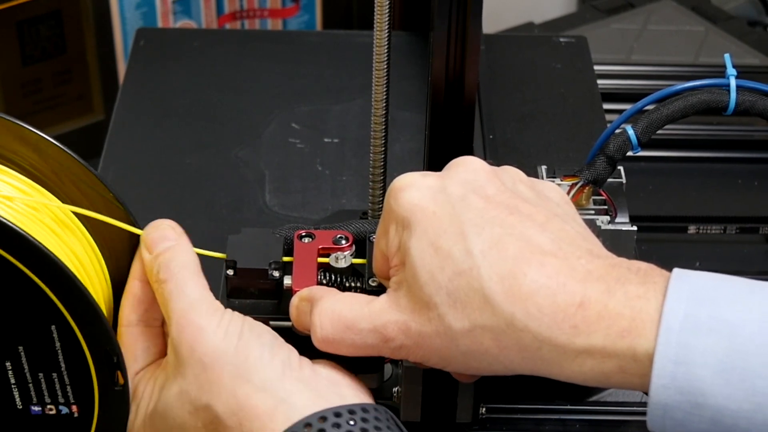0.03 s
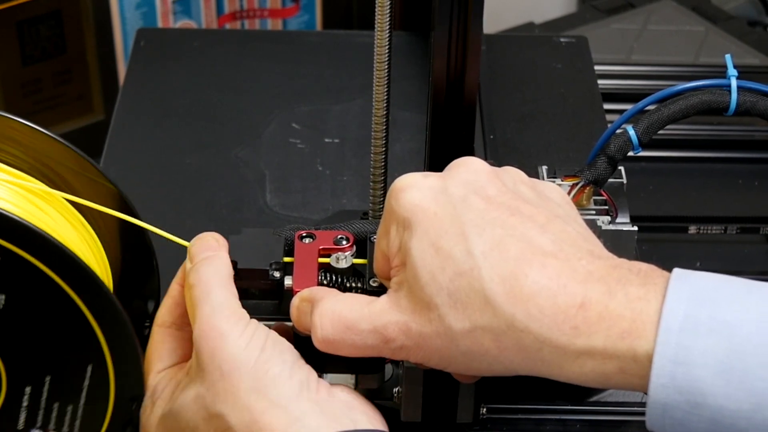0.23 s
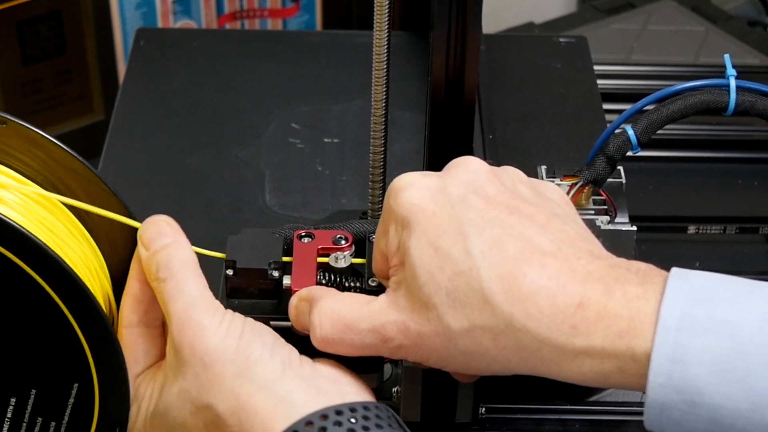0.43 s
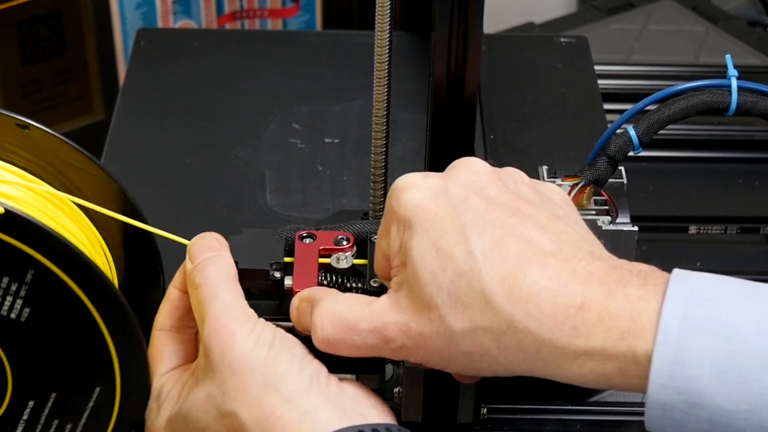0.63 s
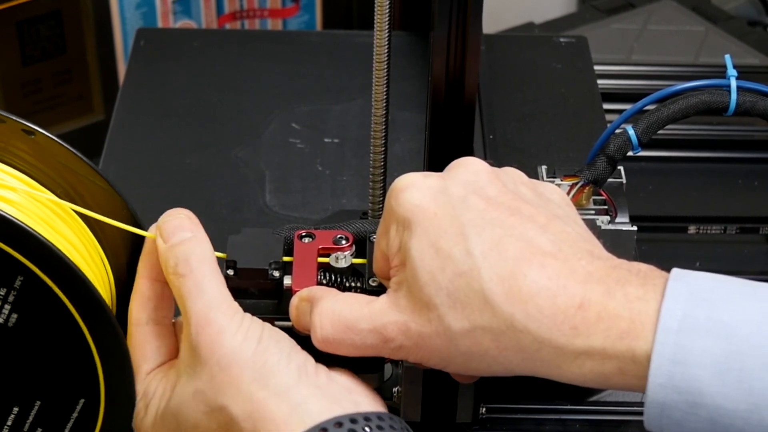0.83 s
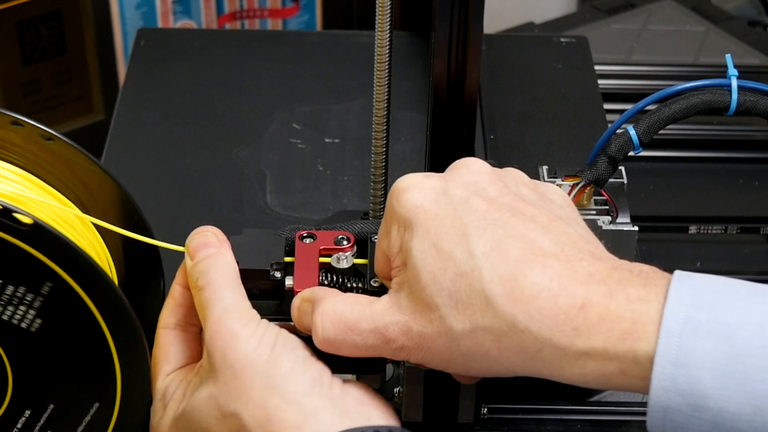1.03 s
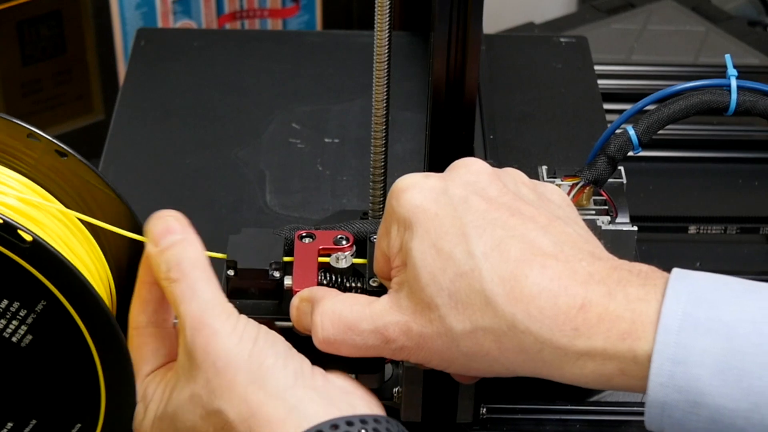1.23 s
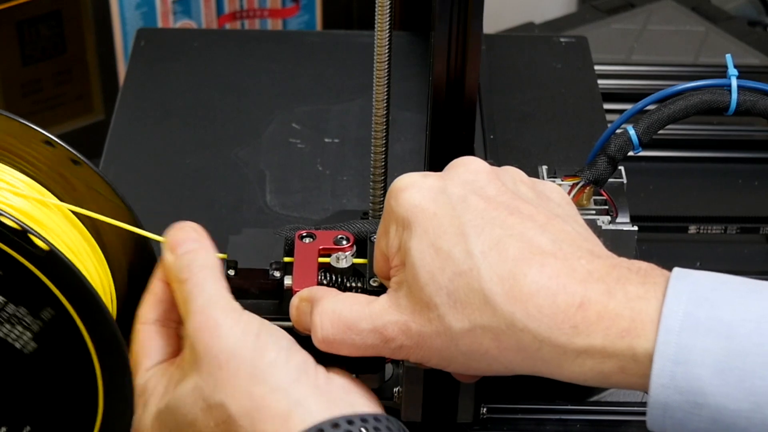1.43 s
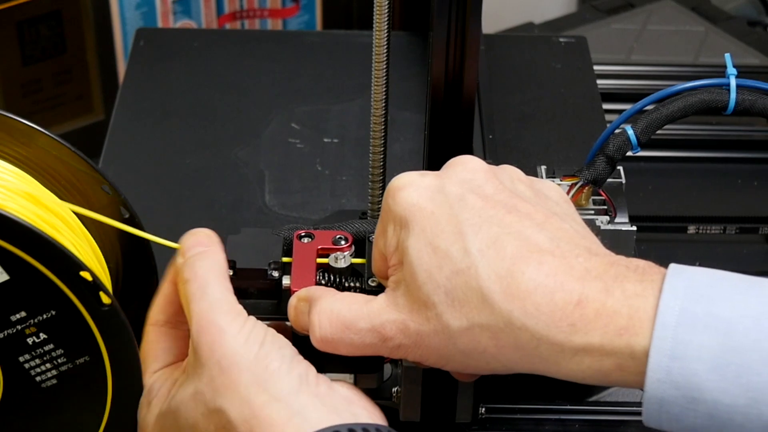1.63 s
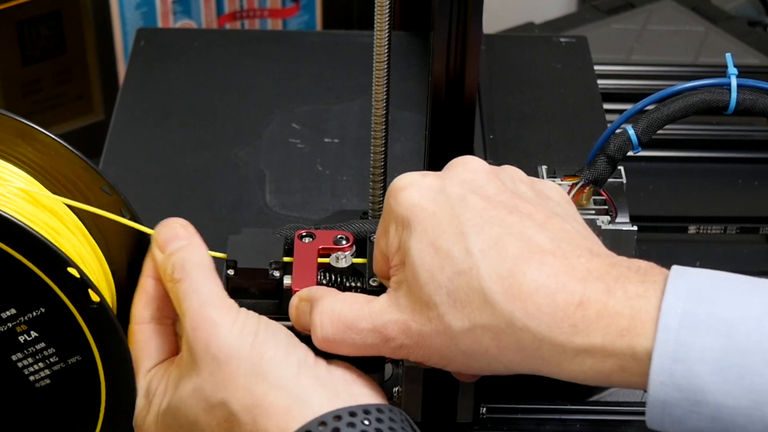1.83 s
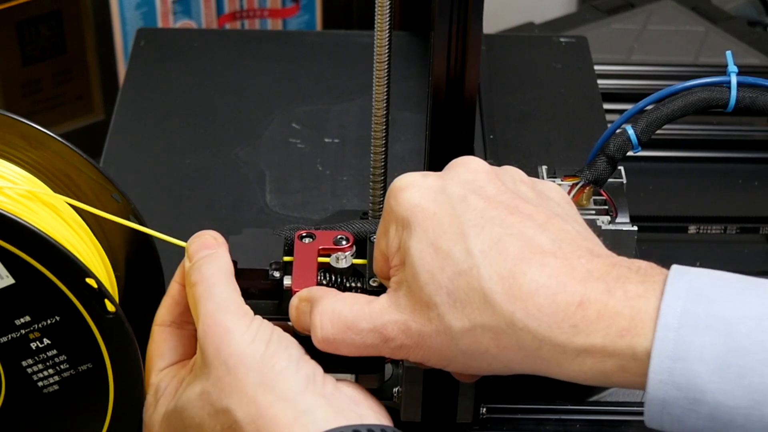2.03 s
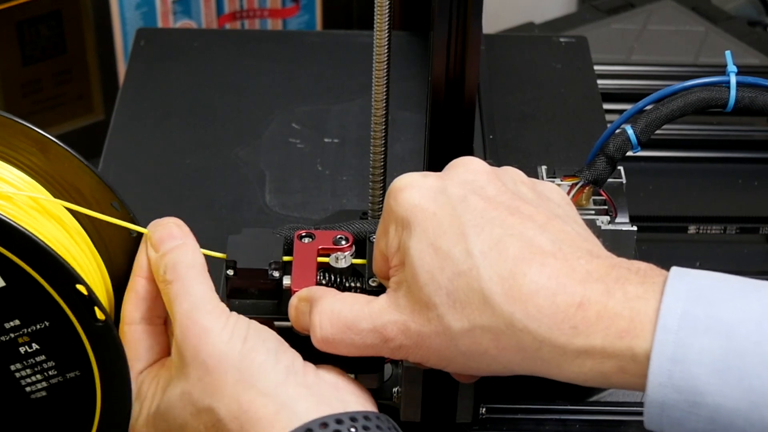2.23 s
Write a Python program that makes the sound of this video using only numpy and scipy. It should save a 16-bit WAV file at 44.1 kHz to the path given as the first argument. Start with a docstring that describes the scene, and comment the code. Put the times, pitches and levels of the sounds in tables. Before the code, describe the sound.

A plastic spool knocks on its holder as filament is fed into a printer in five strokes. The strand scrapes and ticks, and most tugs bring a sharp clink, then a dull thud, close by in a small quiet room.

```python
"""A small quiet room, where a hand feeds plastic filament into a printer's extruder in five strokes.
The strand scrapes and ticks through the feeder in a stream of stick-slip grains. Each tug knocks the
spool on its holder, mostly with a sharp clink; the spool rebounds, then drops back with a thud
through the frame. Faint finger rustle, a wavering hum and room air lie underneath."""
import sys
import numpy as np
from scipy import signal
from scipy.fft import rfft, irfft
from scipy.io import wavfile

SR = 44100
rng = np.random.default_rng(int(sys.argv[2]) if len(sys.argv) > 2 else 0)


def store_wav(level_fs):
    """Save 16-bit WAV to argv[1]."""
    pcm = np.round(np.clip(np.atleast_2d(level_fs), -1, 1) * 32767)
    wavfile.write(sys.argv[1], SR, pcm.T.astype(np.int16))


N = 105840
T = np.arange(N) / SR

# Hollow midrange clatter of a spool contact: freq_hz, level_db
CLATTER_SPECTRUM = [(60, -11), (150, -11), (260, -2.5), (400, -5.5), (580, 2.5), (690, -0.5), (890, -4),
                    (1050, -10.5), (1250, -23), (2500, -24), (16000, -64)]
# Hard crack at the front of a spool contact: freq_hz, level_db
CRACK_SPECTRUM = [(300, -1), (1100, 15.5), (2200, -2.5), (4200, -7.5), (6000, -8.5), (16000, -80)]
CLATTER_T60_S, CRACK_T60_S = 0.16, 0.1


def amp(db):
    """Decibels to gain."""
    return 10 ** (np.asarray(db) / 20)


def colour(x, spectrum):
    """EQ a signal along a curve of (freq_hz, level_db) points, then scale it to rms 1."""
    hz, db = np.array(spectrum).T
    curve_db = np.interp(np.log(np.fft.rfftfreq(N, 1 / SR) + 1), np.log(hz), db)
    shaped = irfft(rfft(x) * amp(curve_db), N)
    return shaped / shaped.std()


def noise(spectrum):
    """Coloured noise, rms 1."""
    return colour(rng.standard_normal(N), spectrum)


def drift(rate_hz):
    """Smooth random wander, spread near 1."""
    return np.interp(T * rate_hz, np.arange(256), rng.standard_normal(256))


def fade(t, t60_s):
    """Full level until t = 0, then an exponential decay."""
    return np.exp(-np.log(1000) * np.maximum(t, 0) / t60_s)


def burst(start_s, rise_s, t60_s):
    """Envelope of a hit: linear attack, exponential decay."""
    return np.clip((T - start_s) / rise_s, 0, 1) * fade(T - start_s - rise_s, t60_s)


def ring(modes, start_s, rise_s, eq_db=lambda hz: 0, hold_s=0):
    """Struck modes, slightly detuned on each hit; rise_s holds at 500 Hz, lower modes bloom later."""
    out, first = np.zeros(N), int(start_s * SR)
    t = T[:min(SR // 2, N - first)]
    for hz, db, t60_s in modes:
        cycles = hz * (1 + 0.0034 * rng.standard_normal()) * t + rng.random()
        attack_s = rise_s * (500 / hz) ** 0.34
        envelope = np.minimum(t / attack_s, 1) * fade(t - attack_s - hold_s, t60_s)
        out[first:first + len(t)] += amp(db + eq_db(hz)) * np.sin(2 * np.pi * cycles) * envelope
    return out


def grit(grains_per_s=10000, spread_db=0.5):
    """Dense stick-slip clicks of uneven size."""
    grains = (rng.random(N) < grains_per_s / SR) * rng.standard_normal(N)
    return grains * amp(spread_db * np.minimum(rng.exponential(size=N), 4))


def room_tone():
    """A bed of dark room air and a faint hum that wavers in level and phase."""
    # Room air: freq_hz, level_db
    air_spectrum = [(25, -22), (45, -20), (72, -8), (110, -13.5), (175, -16.5), (260, -7), (400, -9.5),
                    (600, -15), (870, -13.5), (1300, -21.5), (2100, -25.5), (3800, -53), (4800, -35),
                    (16000, -43)]
    # Room hum: pitch_hz, level_db
    hum_tones = [(178, -62)]
    out = amp(-55) * noise(air_spectrum)
    for hz, db in hum_tones:
        level = np.sqrt(2) * amp(db + 2.5 * drift(13.44))
        out += level * np.sin(2 * np.pi * hz * T + 0.13 * drift(8.87))
    return out


def finger_rustle():
    """Fingers rub faintly throughout, a fine grain with a flickering level."""
    # Papery finger friction: freq_hz, level_db
    rustle_spectrum = [(200, -15), (900, -3.5), (2600, 6.5), (3700, 10), (4900, -1.5), (8000, -58),
                       (16000, -26.5)]
    return amp(-64 + 1.2 * drift(26.41)) * colour(grit(), rustle_spectrum)


def spool_bumps():
    """The spool settles with soft, dull bumps."""
    # Settling bumps: start_s, level_db
    bumps = [(0.018, -58.5), (0.683, -35.5), (0.789, -37), (1.556, -43.5), (2.11, -46.5), (2.256, -48)]
    # Muffled low-mid body of a bump: freq_hz, level_db
    bump_spectrum = [(120, -15), (260, -7), (350, 0), (430, -1.5), (650, -18), (1200, -35), (4000, -53)]
    envelope = sum(amp(db) * burst(start_s, rise_s=0.008, t60_s=0.12) for start_s, db in bumps)
    return envelope * noise(bump_spectrum)


def filament_scrape():
    """The strand scrapes and ticks through the feeder, brighter when it moves fast."""
    # Slides of the strand: full_speed_s, half_rise_s, hold_s, t60_s, level_db
    slides = [(0.152, 0.0098, 0.0072, 0.11, -40), (0.231, 0.041, 0.078, 0.17, -49),
              (0.398, 0.04, 0.024, 0.35, -46), (0.608, 0.017, 0.019, 0.23, -43),
              (0.727, 0.098, 0.035, 0.22, -58.5), (1.044, 0.022, 0.0046, 0.12, -52),
              (1.453, 0.018, 0.025, 0.098, -56), (1.572, 0.027, 0.054, 0.23, -48.5),
              (1.666, 0.006, 0.0086, 0.063, -42.5), (1.688, 0.0055, 0.0056, 0.24, -47),
              (1.798, 0.035, 0.0084, 0.19, -52.5), (1.93, 0.0064, 0.046, 0.093, -48.5),
              (1.995, 0.012, 0.0074, 0.078, -39), (2.146, 0.0067, 0.017, 0.042, -58)]
    # Ticks of the strand in the feeder: start_s, level_db
    ticks = [(0.0657, -47), (0.1935, -44.5), (0.216, -41.5), (0.2965, -55), (0.307, -45), (0.4131, -41.5),
             (0.5226, -52.5), (0.628, -51.5), (0.8385, -51.5), (0.9033, -58), (0.9533, -47.5),
             (1.1954, -48.5), (1.268, -53), (1.327, -55.5), (1.4568, -56), (1.566, -57), (1.605, -52),
             (1.8387, -52), (1.856, -55), (1.928, -59), (2.107, -52.5), (2.191, -52), (2.2437, -53),
             (2.376, -53)]
    # Rasp of plastic in the feeder: freq_hz, level_db
    scrape_spectrum = [(200, -33), (900, -4.5), (2100, -4.5), (2700, -4.5), (3350, 1.5), (3850, 4.5),
                       (4300, 0.5), (4800, -4), (5600, -5), (8000, -8), (12000, -8), (16000, -9.5)]
    effort = np.zeros(N)
    for full_speed_s, half_rise_s, hold_s, t60_s, db in slides:
        swell = np.clip((T - full_speed_s) / (2 * half_rise_s) + 1, 0, 1) ** 2
        effort += amp(db) * swell * fade(T - full_speed_s - hold_s, t60_s)
    effort *= amp(0.93 * drift(90))  # the slides flutter in level
    for start_s, db in ticks:
        edge = 1 + 0.44 * (T < start_s + 0.0025)  # a harder first instant
        effort += amp(db) * edge * burst(start_s, rise_s=0.00026, t60_s=0.085)
    scrape = colour(grit(), scrape_spectrum)
    dull = signal.sosfilt(signal.butter(1, 4300, fs=SR, output="sos"), scrape)
    brightness = effort / (effort + amp(-37.5))
    return effort * (dull + brightness * (scrape - dull))


def spool_knocks():
    """The spool hits its holder and rebounds: its body rings and clatters, its flange cracks."""
    # Knocks and rebounds: start_s, level_db, low_body_db, high_ring_db, crack_db
    knocks = [(0.2386, -38, 9, 13, -38), (0.2444, -23.5, -4.5, -4.5, -40.5), (0.325, -46, -4, 7, -48),
              (0.675, -33, 2.5, -0.5, -42.5), (0.760, -33.5, -10, -7.5, -43), (1.1059, -29.5, 1.5, 5, -35),
              (1.133, -46.5, -6, 8, -46), (1.1948, -38.5, 8, -2, -48.5), (1.578, -32.5, -3.5, 1, -41.5),
              (1.604, -40.5, 7, -15, -49), (1.641, -42, 6.5, 3.5, -62), (2.0134, -30.5, 1, -6.5, -49),
              (2.096, -39, 6.5, -7, -50)]
    # Resonances of the spool body: pitch_hz, level_db, t60_s
    spool_modes = [(170, -15, .1), (205, -11, .14), (243, -7, .14), (266, -3, .18), (288, -10, .14),
                   (345, -8, .12), (382, -7, .15), (495, -11, .12), (550, -3, .12), (578, -5, .11),
                   (632, -9, .12), (755, -3, .12), (858, -2, .12), (900, 1, .14), (935, -11, .2),
                   (1010, -18, .12), (1098, -19, .18)]
    # Bright resonances of the flange: pitch_hz, level_db, t60_s
    flange_modes = [(1251, -7, .11), (1420, -4, .08), (1610, -2, .09), (1895, 0, .07), (2105, -5, .07),
                    (2378, -5, .08), (2806, -6, .18), (3876, -13, .1)]
    body_rise_s, punch_s, boom_hz = 0.0078, 0.024, 74
    out, clatter, crack = np.zeros(N), noise(CLATTER_SPECTRUM), noise(CRACK_SPECTRUM)
    for start_s, db, low_db, high_db, crack_db in knocks:
        body = ring(spool_modes, start_s, body_rise_s,
                    eq_db=lambda hz: low_db * (hz < 420) + high_db * (hz > 700))
        rattle = clatter * burst(start_s, body_rise_s, CLATTER_T60_S)
        punch = 1 + amp(-5.5) * np.exp(-((T - start_s) / punch_s) ** 4)
        out += amp(db) * punch * (amp(-7.5) * body + amp(-6.5) * rattle)
        flange = ring(flange_modes, start_s, rise_s=0.0023)
        attack = crack * burst(start_s, 0.00033, CRACK_T60_S)
        out += amp(crack_db) * (amp(-6.5) * flange + amp(-4.5) * attack)
        if db > -39:  # the harder knocks wake a low room resonance
            boom = np.sin(2 * np.pi * boom_hz * (T - start_s))
            out += amp(-51.5) * boom * burst(start_s, rise_s=0.013, t60_s=0.55)
    return out


def taut_clinks():
    """A hard contact snaps and rings high as the strand goes taut."""
    # Sharp clinks, mostly on the knocks: start_s, level_db, top_db
    clinks = [(0.2468, -34, 2), (0.678, -46, 0), (0.795, -58, -8), (1.1085, -46, -6), (1.5375, -59, -4),
              (2.0175, -50, -4)]
    # High partials of the contact: pitch_hz, level_db
    partials = [(7000, 1), (7950, -1.5), (8380, -10), (8930, -2.5), (9120, -8), (9480, -8), (10400, -20)]
    # Crisp snap of the contact: freq_hz, level_db
    snap_spectrum = [(1000, -44), (6100, -7), (7000, 3), (9500, 2), (11500, -3), (13000, -9), (16000, -26)]
    out, snap = np.zeros(N), noise(snap_spectrum)
    ring_t60_s, crossover_hz = 0.08, 10200
    modes = [(hz, db, ring_t60_s) for hz, db in partials]
    for start_s, db, top_db in clinks:
        hit = snap * burst(start_s, rise_s=0.00019, t60_s=0.06)
        hit += amp(-3.5) * ring(modes, start_s, rise_s=0.004)
        low = signal.sosfiltfilt(signal.butter(4, crossover_hz, fs=SR, output="sos"), hit)
        out += amp(db - 3.5) * (low + amp(top_db) * (hit - low))
    return out


def frame_thuds():
    """The spool drops back, and its weight thuds through the holder and frame."""
    # Drops of the spool: start_s, level_db, bass_db, top_db, crack_db
    thuds = [(0.4125, -30, 0.5, -4.5, -47), (0.807, -34.5, -5, 0, -52), (1.248, -33, -1, -1, -50.5),
             (1.7949, -31, -3, -2.5, -48.5)]
    # Resonances of the holder and frame: pitch_hz, level_db, t60_s
    frame_modes = [(74, -11, .3), (105, -18, .15), (156, -3, .12), (240, -3, .12), (269, -1, .15),
                   (345, -7, .14), (366, -4, .15), (435, -4, .16), (465, -5, .14), (549, 0, .12),
                   (576, -7, .1), (630, -11, .12), (668, -11, .13), (755, -16, .12), (858, -15, .11)]
    out, clatter, crack = np.zeros(N), noise(CLATTER_SPECTRUM), noise(CRACK_SPECTRUM)
    for start_s, db, bass_db, top_db, crack_db in thuds:
        frame = ring(frame_modes, start_s, rise_s=0.0022, hold_s=0.01,
                     eq_db=lambda hz: bass_db * (hz < 200) + top_db * (hz > 480))
        rattle = clatter * burst(start_s, 0.00067, CLATTER_T60_S)
        out += amp(db) * (amp(-4.5) * frame + amp(-13) * rattle)
        out += amp(crack_db) * crack * burst(start_s, 0.0014, CRACK_T60_S)
    return out


def room_reverb(direct):
    """The small room answers with a short, warm tail."""
    # Colour of the reflections: freq_hz, level_db
    tail_spectrum = [(50, 4), (300, 5), (1000, -5), (4000, -4.5), (16000, -6.5)]
    tail = noise(tail_spectrum) * burst(0, rise_s=0.0054, t60_s=0.3)
    return signal.fftconvolve(direct, tail / np.linalg.norm(tail))[:N]


def scene():
    """Mono mix: the handling and its reverb over room tone and finger rustle."""
    bed = room_tone() + finger_rustle()
    handling = spool_bumps() + filament_scrape() + spool_knocks() + taut_clinks() + frame_thuds()
    return (bed + handling + amp(-10.5) * room_reverb(handling))[None]


def record(dry):
    """Steep filters trim the deep bass and the very top."""
    low_cut = signal.butter(8, 62, "high", fs=SR, output="sos")
    high_cut = signal.ellip(10, 0.2, 70, 15750, fs=SR, output="sos")
    return signal.sosfilt(high_cut, signal.sosfilt(low_cut, dry))


dry = scene()
out = record(dry)
store_wav(out)
```